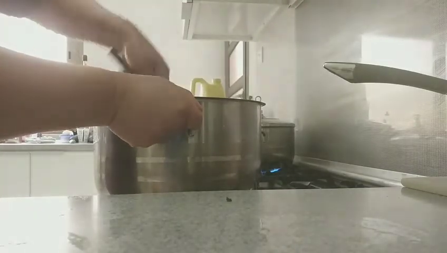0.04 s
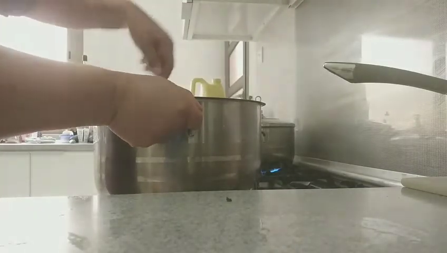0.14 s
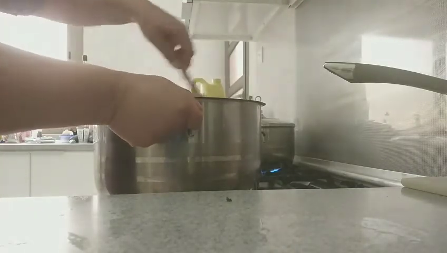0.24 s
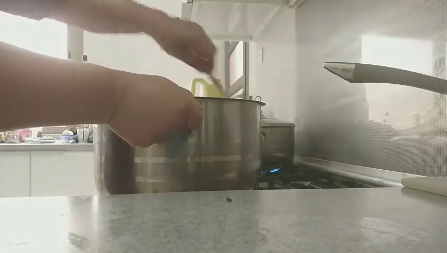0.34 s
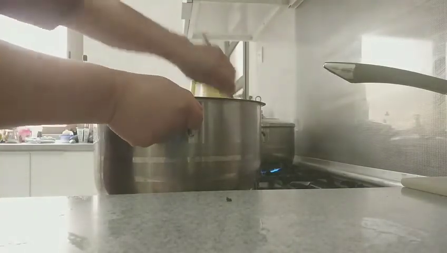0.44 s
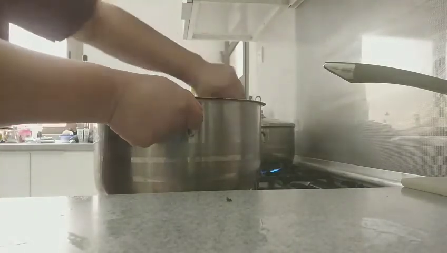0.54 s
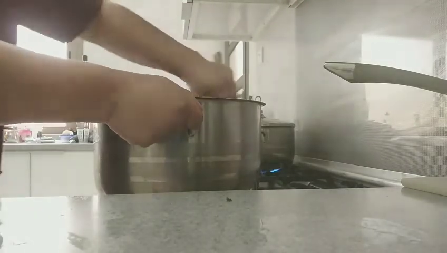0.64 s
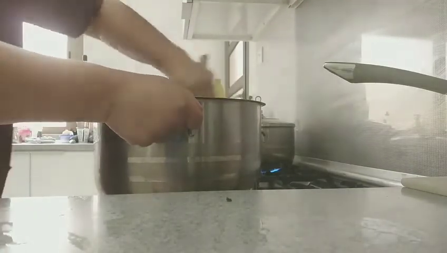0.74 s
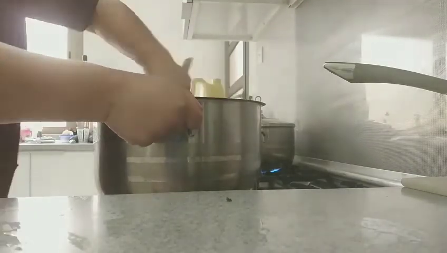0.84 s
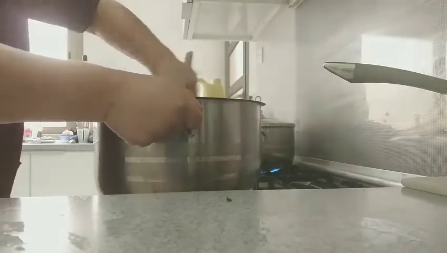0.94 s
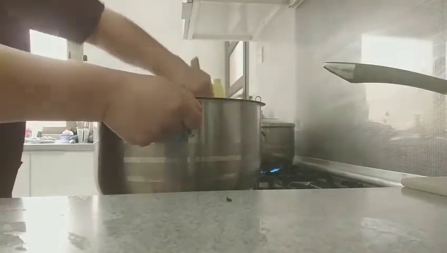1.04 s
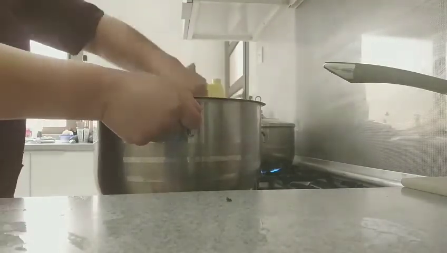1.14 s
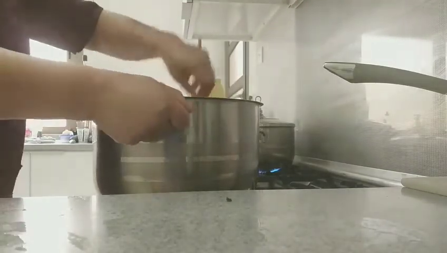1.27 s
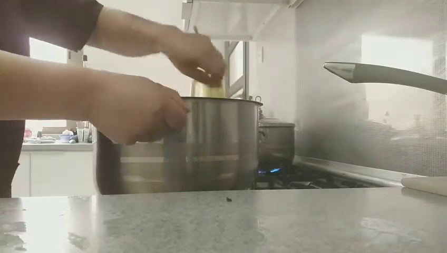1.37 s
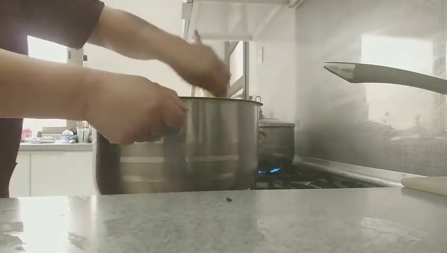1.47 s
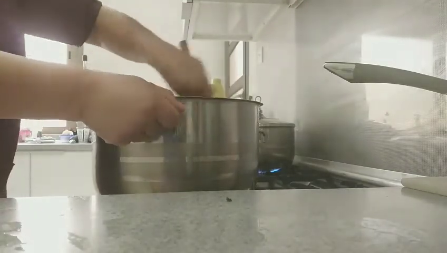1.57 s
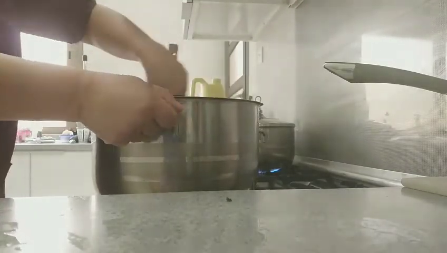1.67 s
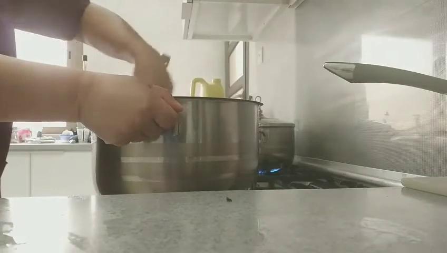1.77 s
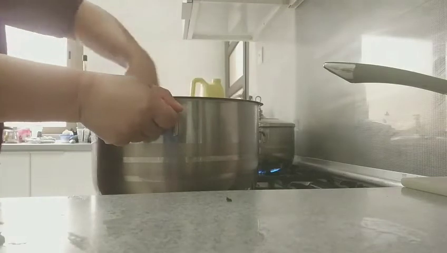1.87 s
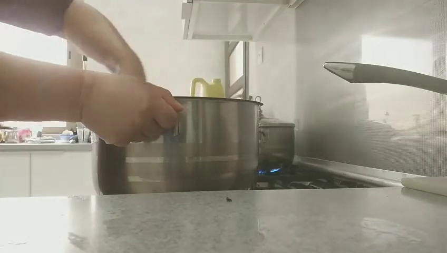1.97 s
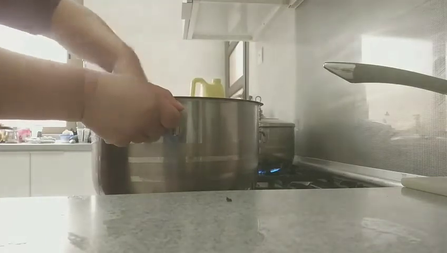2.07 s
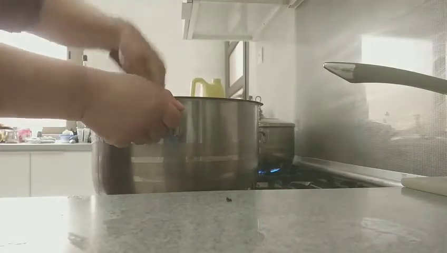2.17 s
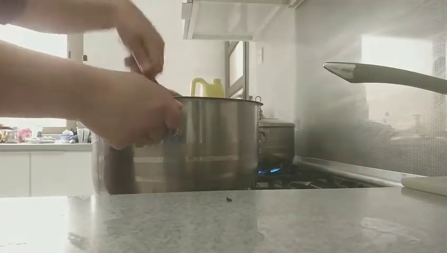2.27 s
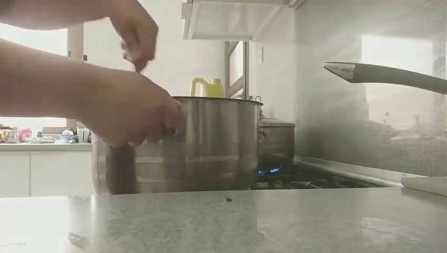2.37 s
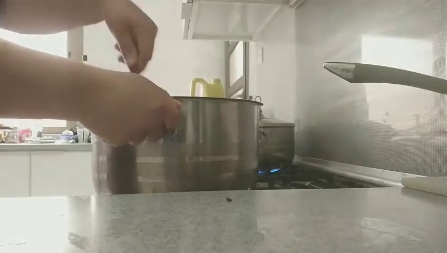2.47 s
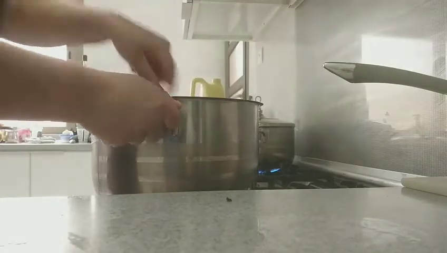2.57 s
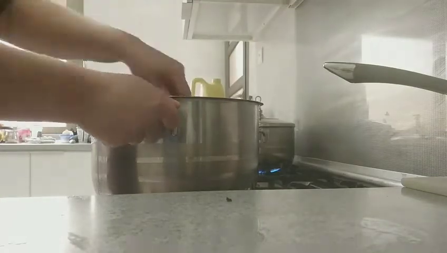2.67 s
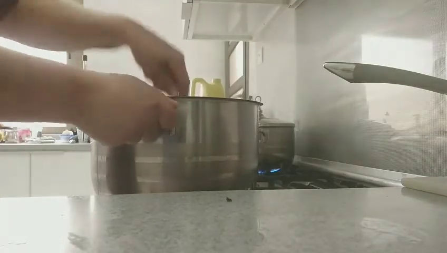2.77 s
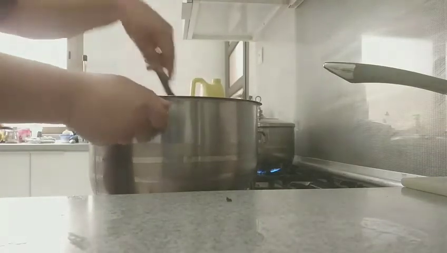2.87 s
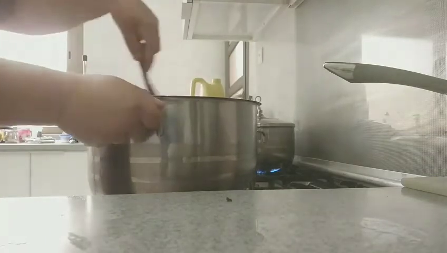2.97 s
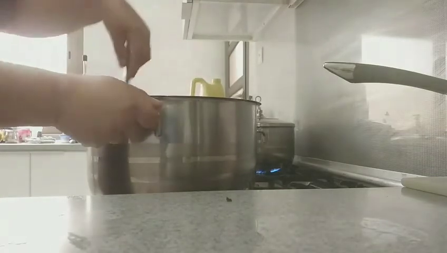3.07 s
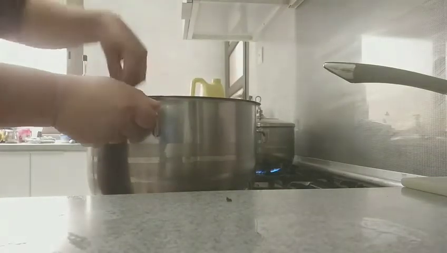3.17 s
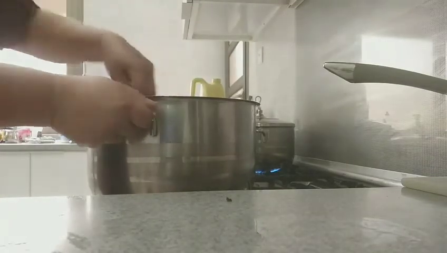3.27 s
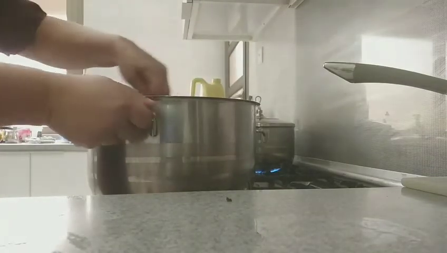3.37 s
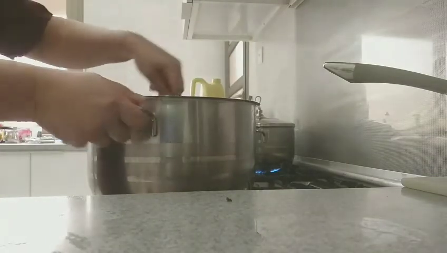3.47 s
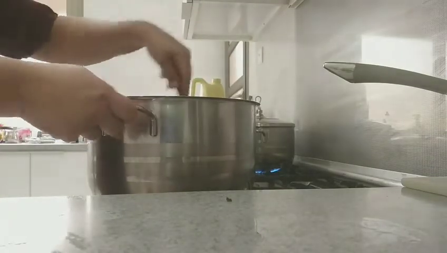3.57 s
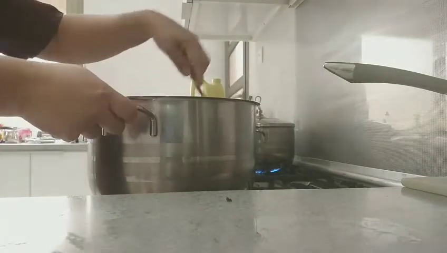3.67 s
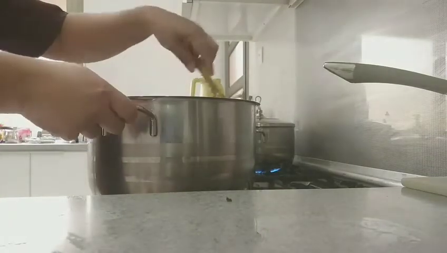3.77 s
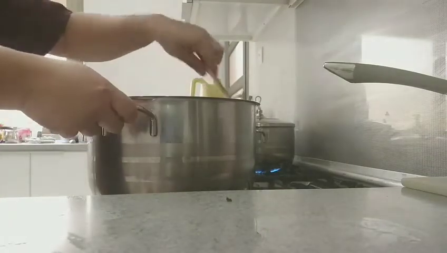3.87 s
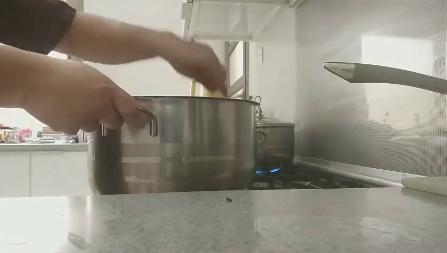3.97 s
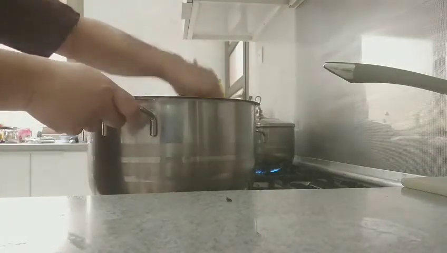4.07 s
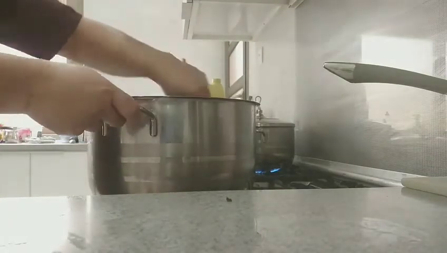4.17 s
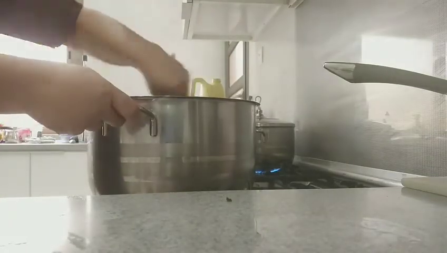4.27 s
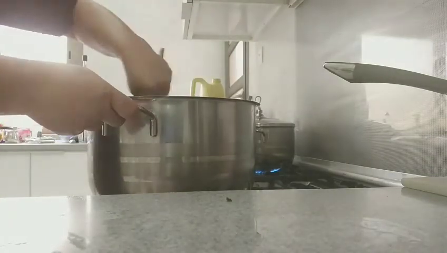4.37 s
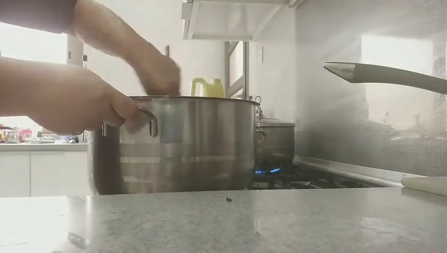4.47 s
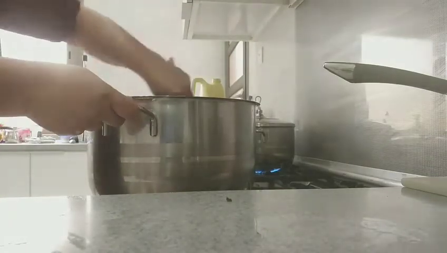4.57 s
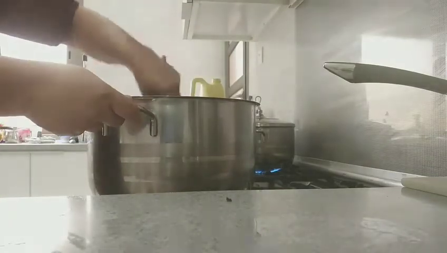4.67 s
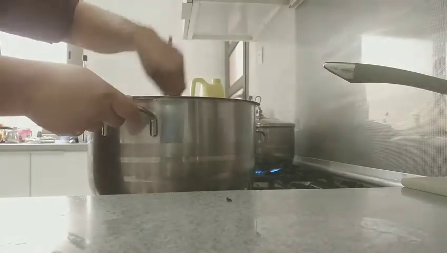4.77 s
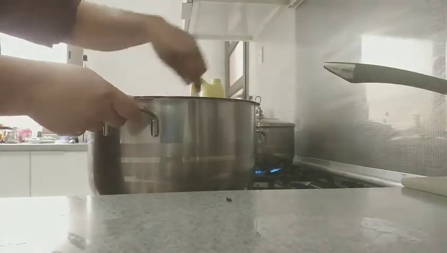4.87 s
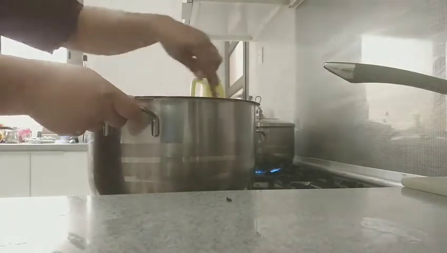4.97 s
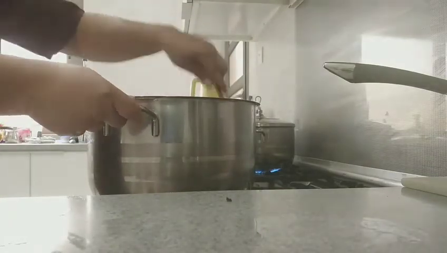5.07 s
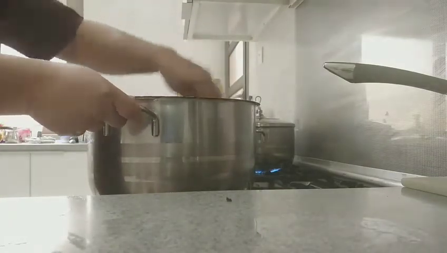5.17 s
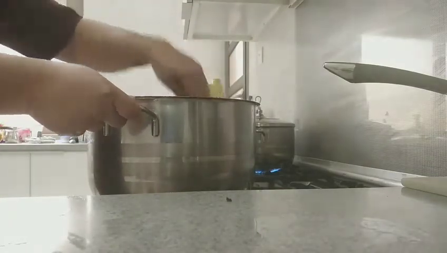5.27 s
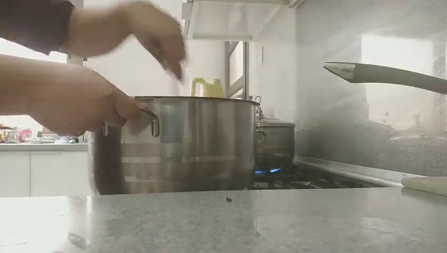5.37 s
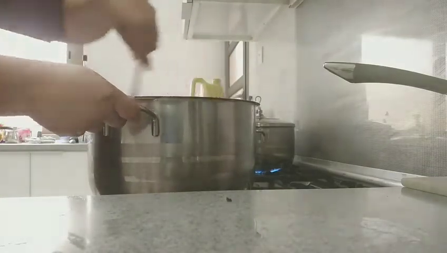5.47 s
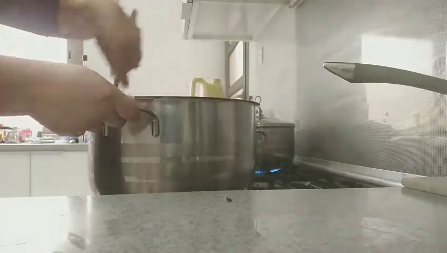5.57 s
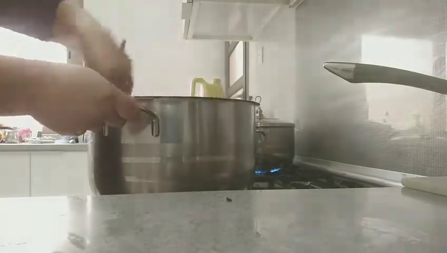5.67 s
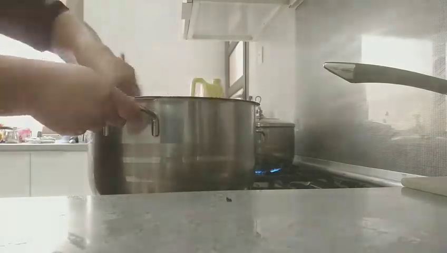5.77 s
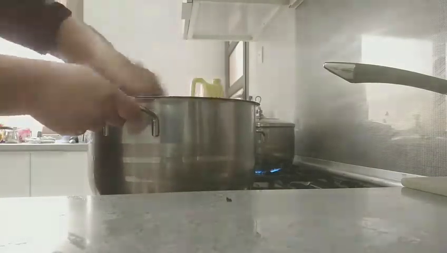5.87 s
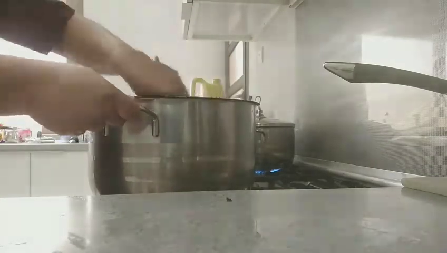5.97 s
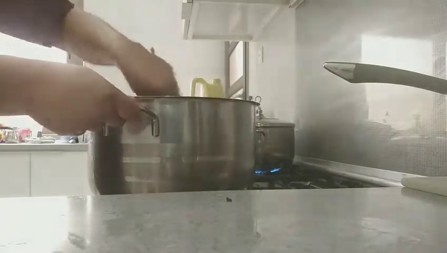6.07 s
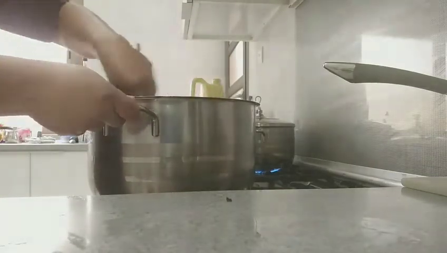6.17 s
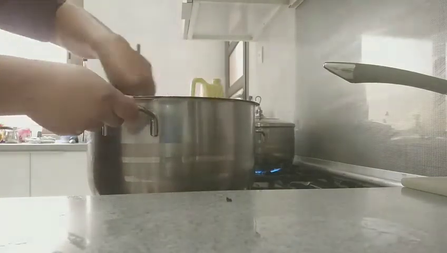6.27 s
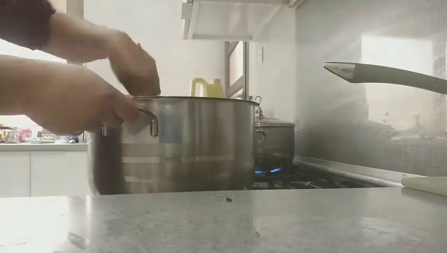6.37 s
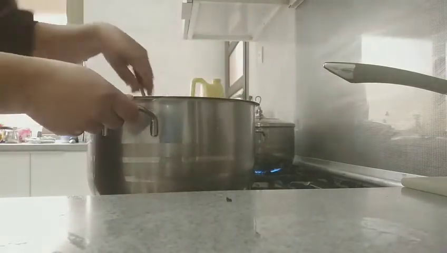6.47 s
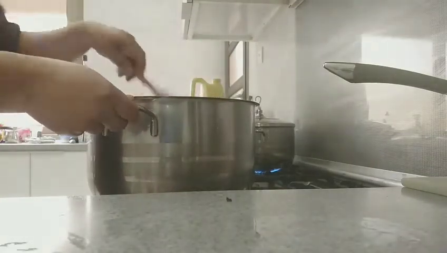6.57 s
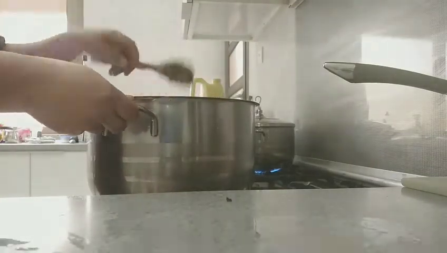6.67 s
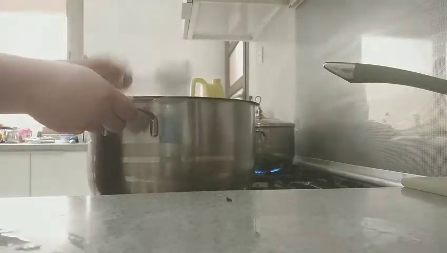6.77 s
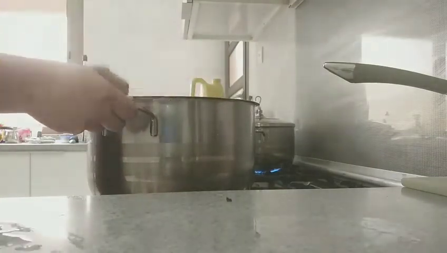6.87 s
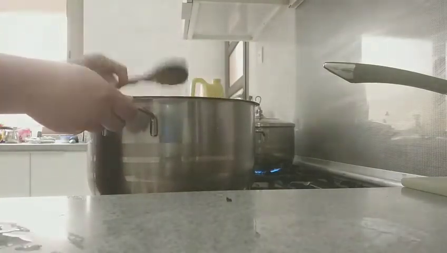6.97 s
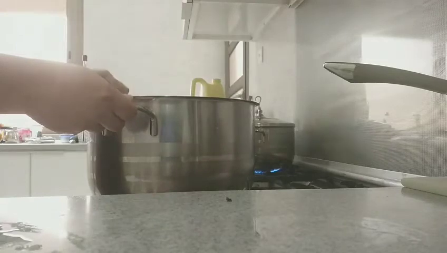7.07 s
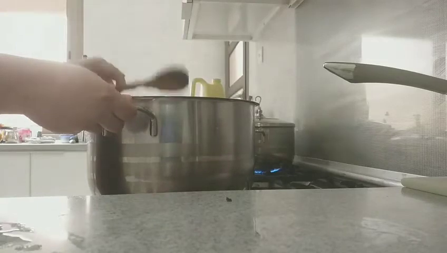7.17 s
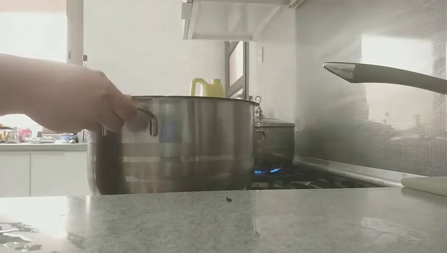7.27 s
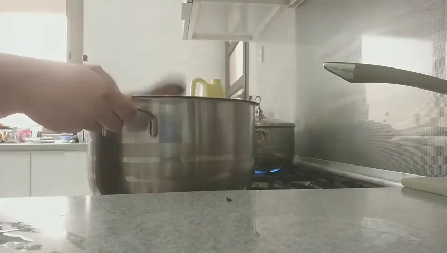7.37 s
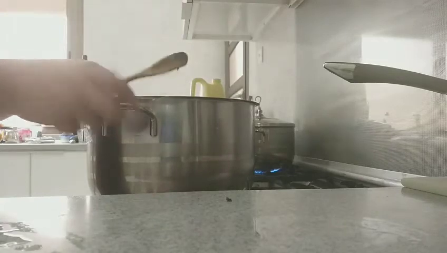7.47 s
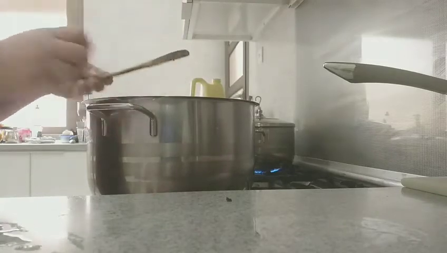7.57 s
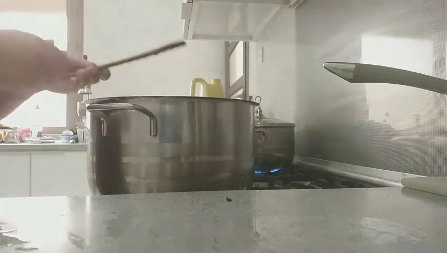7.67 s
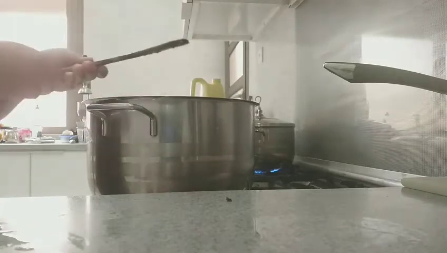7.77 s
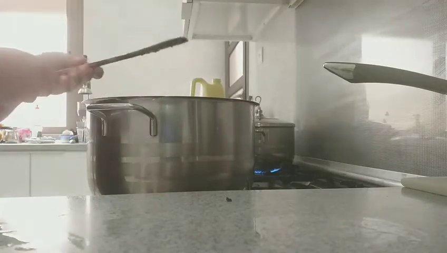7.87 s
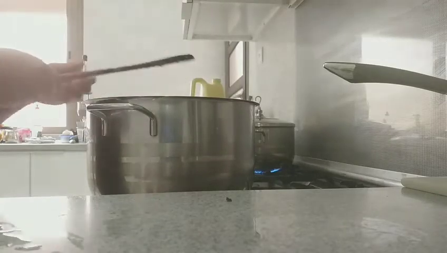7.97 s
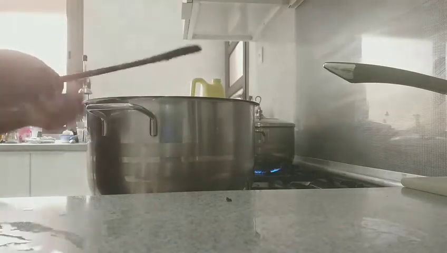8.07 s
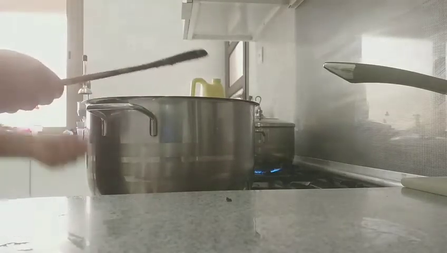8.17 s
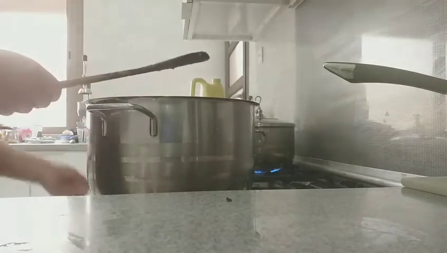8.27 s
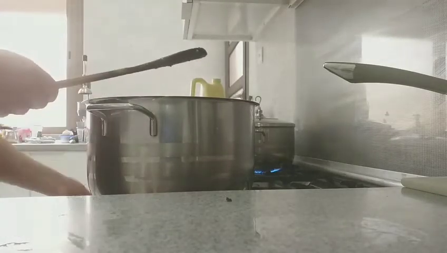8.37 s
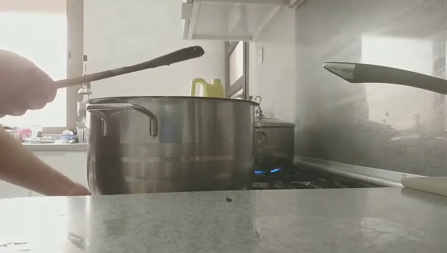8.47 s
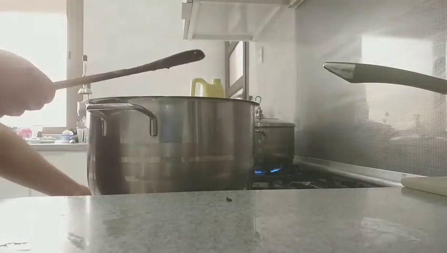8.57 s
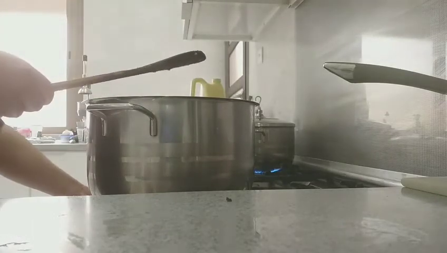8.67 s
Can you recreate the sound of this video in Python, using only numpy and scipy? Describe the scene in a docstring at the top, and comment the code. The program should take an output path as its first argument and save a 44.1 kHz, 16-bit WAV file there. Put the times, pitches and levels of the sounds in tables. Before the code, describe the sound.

A metal spoon stirs wet food in a big steel pot, scraping and knocking, then raps the rim three times.

```python
"""A hard-walled kitchen, close to a gas stove: a long metal spoon stirs food in a big steel pot. The spoon's
bowl knocks the wall and bottom, the pot once shifts on the grate with a dull thud, its handle clinks on the
rim, and three final raps shake it clean; each blow is a crack, a dense clatter and the pot's ringing modes.
Between blows the bowl sticks and slips on the steel, and wet food churns, crackles and opens ringing hollows.
The burner hums below."""
import sys
import numpy as np
from scipy import signal
from scipy.fft import rfft, irfft
from scipy.io import wavfile
from scipy.ndimage import uniform_filter1d

SR = 44100
rng = np.random.default_rng(int(sys.argv[2]) if len(sys.argv) > 2 else 0)


def bounce(signal):
    """Save signal as a 16-bit WAV file at the path given by the first command-line argument."""
    frames = np.transpose(np.atleast_2d(signal))
    limited = np.clip(frames, -1, 1)
    pcm = np.round(limited * 32767).astype(np.int16)
    wavfile.write(sys.argv[1], SR, pcm)


N = 384552
TIME_S = np.arange(N) / SR
RING_S = np.arange(60000) / SR  # time axis of one ring

# Pot resonances: f/Hz, level struck at rim/dB, level struck at wall/dB, t60/s
POT_RESONANCES = [(94, 11, 10, 0.6), (195, 16, 12, 0.7), (243, 9, 11, 0.6), (300, 14, 10, 0.8),
                  (353, 17, 5, 0.7), (444, 15, 12, 0.7), (931, 11, 22, 0.53), (977, 16, 22, 0.58),
                  (1050, 14, 18, 0.7), (1195, 9, 10, 0.7), (1270, 17, 11, 0.45), (1373, 12, 1, 1),
                  (1511, 15, 6, 0.7), (1561, 10, 1, 0.6), (1626, 10, 1, 0.6), (1695, 19, 11, 1.2),
                  (1738, 15, 3, 0.9), (1781, 9, 1, 0.7), (2075, 5, 13, 0.45), (2462, 11, 5, 0.5),
                  (2562, 13, 3, 0.7), (2675, 17, 9, 0.5), (2716, 11, 20, 0.5), (2923, 12, 3, 0.5),
                  (3071, 7, 16, 0.3), (3499, 12, 12, 0.5), (5500, 12, 6, 0.6), (5792, 2, 5, 0.4),
                  (6378, 11, 5, 0.1), (7772, 13, 5, 0.06)]
def pot_modes(place, thin_db=4, thin_t60_s=0.44, count=90):
    """Strong modes of the pot, struck at rim or wall, plus a crowd of thin high ones; one row each."""
    hz, rim_db, wall_db, t60_s = np.transpose(POT_RESONANCES)
    thin_hz = 2400 + 6900 * (np.arange(count) + rng.random(count)) / count
    levels_db = thin_db + 2 * rng.standard_normal(count)
    thin = ringing(thin_hz, levels_db, thin_t60_s * (5000 / thin_hz) ** 0.49)
    strong = ringing(hz, rim_db if place == "rim" else wall_db, t60_s)
    return np.vstack([strong, thin])


def blows(table, eq, modes, room, ring_db, room_db, scatter_db, contact_s, crack_db, crack_share,
          early_db=0):
    """Each blow excites crack, clatter, echoes and modes; its level is the rms of the first 30 ms."""
    track = np.zeros(N)
    hz = np.geomspace(100, 16000, 90)
    for start_s, db, tilt_db, cutoff_hz, spot_hz, t60_s in table:
        clatter = burst(t60_s) + undb(crack_db) * burst(crack_share * t60_s)
        ring = undb(ring_db + scatter_db * rng.standard_normal(len(modes))) @ modes
        ring *= 1 + undb(early_db) * fade(t60_s)  # fast loss while the spoon still touches
        echoes = undb(room_db) * signal.fftconvolve(clatter, room)[:len(RING_S)]
        onset = 1 - np.exp(-RING_S / contact_s)
        sound = colour((clatter + ring + echoes) * onset, eq)
        height_db = tilt_db * np.log2(hz / 1000)  # higher on the pot: thinner
        soft_db = -10 * np.log10(1 + (hz / cutoff_hz) ** 8)  # softer blow: duller
        spot_db = 5.5 * np.exp(-(np.log2(hz / spot_hz) / 0.3) ** 2)  # the spot favours one pitch
        sound = colour(sound, np.column_stack([hz, height_db + soft_db + spot_db]))
        add(track, start_s, undb(db) * sound / np.std(sound[:int(0.03 * SR)]))
    return track


# Spoon on rim: t/s, level/dB, tilt/(dB/oct), cut-off/Hz, spot/Hz, clatter t60/s
RIM_RAPS = [(1.63, -36.5, 1.5, 5800, 3450, 0.085), (6.999, -13.5, .7, 14940, 8400, 0.26),
            (7.219, -15, .2, 14000, 8000, 0.24), (7.4555, -16.5, -1.2, 11000, 1845, 0.074)]
# Rap spectrum: f/Hz, level/dB
RAP_EQ = [(30, -44), (85, -10.5), (125, -16.5), (200, -5.5), (370, -5.5), (520, -11.5), (680, -13),
          (1000, -3), (1700, 0), (1950, -8), (2330, -13), (2680, -9.5), (3400, -18), (5400, -11),
          (6400, -11), (6700, -16.5), (9000, -21.5), (10300, -30), (15000, -34.5)]
def raps(modes, room):
    """The spoon strikes the rim, once in passing and three times hard."""
    return blows(RIM_RAPS, RAP_EQ, modes, room, ring_db=-1.5, room_db=-4.5, scatter_db=0.4,
                 contact_s=0.0004, crack_db=5.5, crack_share=0.3, early_db=10)


# Bowl on wall: t/s, level/dB, tilt/(dB/oct), cut-off/Hz, spot/Hz, clatter t60/s
WALL_KNOCKS = [(0.584, -37, -1.5, 12000, 2030, 0.26), (2.63, -44.5, 3, 14000, 1380, 0.11),
               (4.08, -36, -1, 1870, 2050, 0.37), (5.223, -37.5, -1, 3220, 2800, 0.28),
               (5.747, -33, 5.5, 3840, 2900, 0.12)]
# Knock spectrum: f/Hz, level/dB
KNOCK_EQ = [(40, -21), (90, -12.5), (170, 0.5), (350, -1), (550, 6), (770, -6.5), (980, 4.5), (1280, -3),
            (1480, -12.5), (2030, -5), (2350, -8.5), (3050, -16.5), (6000, -11.5), (9000, -25.5),
            (10500, -24), (15000, -40.5)]
def knocks(modes, room):
    """The bowl hits the pot wall through the food."""
    return blows(WALL_KNOCKS, KNOCK_EQ, modes, room, ring_db=-0.5, room_db=-4, scatter_db=2.1,
                 contact_s=0.002, crack_db=-5.5, crack_share=0.22)


# Handle on rim: t/s, level/dB, tilt/(dB/oct), cut-off/Hz, spot/Hz, clatter t60/s
HANDLE_CLINKS = [(0.996, -42.5, -0.5, 12000, 3150, 0.3), (1.036, -45.5, -3, 6700, 4200, 0.57),
                 (1.247, -52.5, -4.5, 5440, 4700, 0.087), (2.805, -58, -4.5, 14000, 8000, 0.18),
                 (3.768, -52, 0, 12000, 6000, 0.08), (3.777, -41.5, 1, 12000, 6070, 0.056),
                 (3.812, -49.5, 5, 7000, 2730, 0.065), (4.155, -56.5, 8, 6000, 4800, 0.63),
                 (4.54, -52.5, 5, 6000, 3120, 0.2), (4.556, -46, 0, 7040, 4500, 0.11),
                 (4.59, -51.5, -3.5, 5000, 3920, 0.047), (5.591, -65.5, -5, 10000, 4540, 0.079),
                 (6.405, -64, 2.5, 10000, 8000, 0.13), (7.063, -33, -3.5, 11090, 2680, 0.028),
                 (7.275, -33.5, 1, 7000, 5030, 0.097), (7.528, -56, -6, 5500, 2700, 0.15)]
# Clink spectrum: f/Hz, level/dB
CLINK_EQ = [(800, -21.5), (2100, -10), (2700, -6.5), (3600, -7), (5000, -2), (6400, -5), (7500, -10),
            (9200, -14.5), (10300, -27.5), (15000, -37.5)]
def clinks(modes, room):
    """The handle touches the rim or rebounds on it."""
    return blows(HANDLE_CLINKS, CLINK_EQ, modes, room, ring_db=-5.5, room_db=-9.5, scatter_db=3.5,
                 contact_s=0.0048, crack_db=-15, crack_share=0.34, early_db=1)


# Dull thuds (a faint knock, then the pot shifting on the grate): t/s, level/dB, tilt/(dB/oct), cut-off/Hz,
# spot/Hz, clatter t60/s
DULL_THUDS = [(1.928, -56.5, 1.5, 6000, 1400, 0.28), (5.895, -36.5, .3, 5950, 701, 0.14)]
# Bump spectrum: f/Hz, level/dB
BUMP_EQ = [(30, -46), (48, -30.5), (72, 0), (160, -2.5), (300, -5.5), (450, 4), (730, -3), (820, 0.5),
           (960, -3), (1300, -15), (3000, -25.5), (9000, -34.5), (10500, -43.5)]
def bumps(modes, room):
    """A faint knock of the bowl, and the pot shifting heavily on the grate: dull, cushioned thuds."""
    return blows(DULL_THUDS, BUMP_EQ, modes, room, ring_db=-12.5, room_db=-10.5, scatter_db=0.5,
                 contact_s=0.0048, crack_db=2, crack_share=0.68)


# Drive on the spoon until lifted out: t/s, level/dB
STIR_EFFORT = [(0, 3), (.25, -2), (.45, -9), (.66, 1.5), (.88, -3.5), (1.15, 0.5), (1.75, 4.5), (2.3, 0.5),
               (2.52, -6), (2.8, 2), (3.22, -3), (3.65, -5.5), (4.03, -4), (4.6, 0.5), (5.15, -8.5),
               (5.68, -8.5), (5.9, 2.5), (7.4, -23.5)]
def stirring(modes, room):
    """Jerky stick-slip and moving food; all four sounds grow with effort, the hiss most."""
    effort_db = np.interp(TIME_S, *np.transpose(STIR_EFFORT))
    body = undb(-20) * modes.sum(axis=0) + undb(-2) * room
    body[0] += 1  # direct path
    jerks = undb(0.95 * walk(35))
    slips = signal.fftconvolve(grains(2500, 2.3) * jerks, body)[:N]
    return (wet_hiss(jerks, effort_db) + churn(body, effort_db)
            + scrape(slips, effort_db) + rub(slips, effort_db))


# Drags over the bottom: t/s, length/s, level/dB
SCRAPE_STROKES = [(1.36, 0.16, -47.5), (1.67, 0.085, -55), (2.76, .07, -61.5), (2.98, 0.14, -48.5),
                  (3.35, 0.075, -50), (4.62, 0.075, -62), (6.34, 0.09, -58)]
# Scrape spectrum: f/Hz, level/dB
SCRAPE_EQ = [(150, -16.5), (350, -0.5), (470, -2.5), (590, -2), (820, -3), (1000, 1), (1170, 0), (1350, -5),
             (1600, -2.5), (2800, -7.5), (4000, -15), (9000, -14), (11000, -43)]
def scrape(slips, effort_db):
    """The bowl sticks and slips on the bottom, ringing the spoon."""
    dragged = strokes(SCRAPE_STROKES, attack_s=0.05, release_s=0.09)
    gain = np.hypot(undb(-67 + 0.71 * effort_db), dragged)
    return gain * unit(colour(spoon(slips), SCRAPE_EQ))


# Slides along the wall: t/s, length/s, level/dB
RUB_STROKES = [(.91, 0.25, -56.5), (1.39, 0.13, -53), (1.91, 0.087, -59.5), (3.57, 0.037, -62),
               (4.45, 0.25, -55), (4.8, 0.12, -62.5), (6.08, .13, -62), (6.24, .14, -55), (6.44, 0.19, -61)]
# Rubbed wall spectrum: f/Hz, level/dB
RUB_EQ = [(600, -14.5), (1050, -4.5), (1350, -10.5), (1650, 1), (1900, 1), (2100, -7.5), (2800, -31.5),
          (5000, -47.5)]
def rub(slips, effort_db):
    """The pot wall sings faintly under the sliding spoon."""
    rubbed = strokes(RUB_STROKES, attack_s=0.018, release_s=0.048)
    gain = np.hypot(undb(-63 + 0.55 * effort_db), rubbed)
    return gain * unit(colour(slips, RUB_EQ))


# Food sliding off the bowl: t/s, length/s, level/dB
SLOSH_STROKES = [(.64, 0.039, -57), (1.39, 0.082, -52.5), (3.58, 0.034, -60), (4.18, 0.063, -53.5),
                 (5.33, 0.044, -61), (6.06, .06, -68)]
# Hiss spectrum: f/Hz, level/dB
HISS_EQ = [(1500, -6), (2600, -6.5), (3600, -1.5), (5200, -2), (7000, -0.5), (9200, 0.5), (10200, -15.5),
           (12500, -13), (15000, -21.5)]
def wet_hiss(jerks, effort_db):
    """Wet food crackles in dense clicks, some ringing the spoon."""
    sloshed = strokes(SLOSH_STROKES, attack_s=0.025, release_s=0.026)
    gain = np.hypot(undb(-60 + effort_db), sloshed)
    crackle = grains(9000, 1.5) * jerks + undb(-5) * spoon(grains(5000, 3.2) * jerks)
    return gain * unit(colour(crackle, HISS_EQ))


def spoon(x, t60_s=0.027, shift_db=6, count=3):
    """Damped high resonances of the hand-held spoon; their mix shifts as the contact point travels."""
    shares = np.array([undb(shift_db * walk(5)) for _ in range(count)])
    shares /= np.linalg.norm(shares, axis=0)
    rung = sum(share * signal.fftconvolve(x, burst(t60_s))[:N] for share in shares)
    return colour(x, [(1800, 3.5), (3000, -22)]) + colour(rung, [(1800, -27), (2500, 4.5)])


# Churn spectrum: f/Hz, level/dB
CHURN_EQ = [(35, -20.5), (65, -16), (98, 4.5), (120, -10.5), (160, 3.5), (205, -5), (320, -9), (700, -34)]
def churn(body, effort_db):
    """Lumps of food rumble in the pot."""
    lumps = signal.fftconvolve(grains(400, 1.7), body)[:N]
    return undb(-61 + 0.29 * effort_db) * unit(colour(lumps, CHURN_EQ))


# Hollows in the food: t/s, length/s, f/Hz, level/dB
AIR_HOLLOWS = [(0.167, 0.27, 638, -71), (0.952, 0.23, 760, -64.5), (1.386, 0.16, 603, -57.5),
               (1.884, 0.084, 355, -57), (2.92, 0.21, 567, -54.5), (3.353, 0.089, 644, -64),
               (6.366, 0.089, 585, -56)]
def hollows(room, t60_s=0.048, room_db=-3):
    """The air behind the bowl rings while the rubbing lasts."""
    track = np.zeros(N)
    rubbing = grains(2200, 1.6)
    for start_s, length_s, hz, db in AIR_HOLLOWS:
        start, size = int(start_s * SR), int(length_s * SR)
        drive = rubbing[start:start + size] * np.hanning(size)
        ring = signal.fftconvolve(drive, np.sin(2 * np.pi * hz * RING_S) * fade(t60_s))
        add(track, start_s, undb(db) * ring / np.std(ring[:size]))
    return track + undb(room_db) * signal.fftconvolve(track, room)[:N]


# Flame spectrum: f/Hz, level/dB
FLAME_EQ = [(30, -25.5), (70, -7), (100, -1.5), (165, -1), (310, -11), (750, -10), (970, -4.5),
            (1200, -21.5), (1880, -10), (2200, -23.5), (3500, -29), (6500, -27), (8600, -16),
            (10300, -33.5), (14000, -36), (15300, -29)]
def burner(flame_db=-64.5, flutter_db=0.69, whine_hz=12172, whine_db=-79.5):
    """The flame's soft fluttering rush, and a thin electric whine."""
    rush = unit(colour(rng.standard_normal(N), FLAME_EQ))
    rush *= undb(flame_db + flutter_db * walk(3.6))
    return rush + undb(whine_db) * np.sin(2 * np.pi * whine_hz * TIME_S)


# Room decay: f/Hz, t60/s
ROOM_DECAY = [(100, 0.98), (300, 1), (900, 0.93), (1700, 0.94), (3000, 0.95), (5700, 0.79), (8000, 0.65),
              (13000, 0.25)]
def kitchen(build_s=0.0081, bands=14):
    """Echoes of the tiled walls, energy 1; each band dies at its own pace."""
    spectrum = rfft(rng.standard_normal(len(RING_S)))
    hz = np.fft.rfftfreq(len(RING_S), 1 / SR)
    centres_hz = np.geomspace(80, 14000, bands)
    tail = np.zeros(len(RING_S))
    for centre_hz, share in zip(centres_hz, np.eye(bands)):
        band = irfft(spectrum * np.interp(hz, centres_hz, share))
        tail += band * fade(read(ROOM_DECAY, centre_hz))
    tail *= 1 - np.exp(-RING_S / build_s)
    return tail / np.linalg.norm(tail)


# Side echo spectrum: f/Hz, level/dB
SIDE_EQ = [(400, -43), (1000, -13.5), (2000, 9.5), (3500, -28), (6000, -47), (8500, 5), (12000, 8)]
# Balance: f/Hz, left minus right/dB
BALANCE = [(500, 0), (1200, 1.4), (2000, .7), (4000, 0), (8000, -.4)]
def stereo(mid, room):
    """All sources sit nearly straight ahead; the walls add a little width."""
    side = undb(-25) * colour(signal.fftconvolve(mid, room)[:N], SIDE_EQ)
    lean_db = read(BALANCE, np.fft.rfftfreq(N, 1 / SR))
    return np.array([irfft(rfft(mid) * undb(sign * lean_db / 2), N) + sign * side for sign in (1, -1)])


def ringing(hz, db, t60_s):
    """One row per mode: a fading sine whose resonance peak stands at db."""
    height = undb(db) * 2 * np.log(1000) / (t60_s * SR)
    phase = 2 * np.pi * (hz[:, None] * RING_S + rng.random((len(hz), 1)))
    return height[:, None] * np.sin(phase) * fade(t60_s[:, None])


def burst(t60_s):
    """Modes too dense to tell apart: fading noise of energy 1."""
    x = rng.standard_normal(len(RING_S)) * fade(t60_s)
    return x / np.linalg.norm(x)


def strokes(table, attack_s, release_s):
    """Gain curve: each stroke swells, holds and dies away."""
    gain = np.zeros(N)
    for start_s, length_s, db in table:
        swell = np.clip((TIME_S - start_s) / attack_s, 0, 1)
        release = np.exp(-np.maximum(TIME_S - start_s - length_s, 0) / release_s)
        gain += undb(db) * swell * release
    return gain


def grains(rate_hz, spread_db):
    """Random clicks of uneven size, rms 1."""
    clicks = (rng.random(N) < rate_hz / SR) * rng.standard_normal(N)
    return unit(clicks * undb(spread_db * rng.standard_normal(N)))


def walk(rate_hz):
    """Smooth random drift, spread near 1."""
    hold = int(SR / rate_hz)
    steps = np.repeat(rng.standard_normal(N // hold + 1), hold)
    return 1.4 * uniform_filter1d(uniform_filter1d(steps, hold), hold)[:N]


def colour(x, eq, size=4096):
    """Minimum-phase filter of shape (f/Hz, level/dB)."""
    gain = undb(read(eq, np.fft.rfftfreq(size, 1 / SR)))
    cepstrum = irfft(np.log(gain))
    cepstrum[1:size // 2] *= 2
    cepstrum[size // 2 + 1:] = 0
    impulse = irfft(np.exp(rfft(cepstrum)))
    return signal.fftconvolve(x, impulse)[:len(x)]


def read(points, hz):
    """Interpolate (f/Hz, value) on a log-frequency axis."""
    points_hz, value = np.transpose(points)
    return np.interp(np.log(hz + 1), np.log(np.sort(points_hz)), value)


def fade(t60_s):
    """Exponential decay over one ring."""
    return np.exp(-np.log(1000) * RING_S / np.maximum(t60_s, 1e-3))


def add(track, start_s, sound):
    """Mix a sound into a track."""
    start = int(start_s * SR)
    track[start:start + len(sound)] += sound[:N - start]


def undb(db):
    """Decibels to gain."""
    return 10 ** (np.asarray(db) / 20)


def unit(x):
    """Scale to rms 1."""
    return x / np.sqrt(np.mean(x ** 2))


def scene():
    """Burner, stirring and blows in one kitchen, in stereo."""
    rim, wall, room = pot_modes("rim"), pot_modes("wall"), kitchen()
    mid = burner() + stirring(wall, room) + hollows(room)
    mid += knocks(wall, room) + bumps(wall, room) + clinks(wall, room) + raps(rim, room)
    return stereo(mid, room)


def record(dry, bass_hz=45, ceiling=1.6, top_hz=15500):
    """Thin the deep bass, round the loudest peaks, cut the top."""
    thinned = signal.sosfilt(signal.butter(2, bass_hz, "high", fs=SR, output="sos"), dry)
    rounded = ceiling * np.tanh(thinned / ceiling)
    return signal.sosfilt(signal.ellip(8, .2, 70, top_hz, fs=SR, output="sos"), rounded)


dry = scene()
out = record(dry)
bounce(out)
```